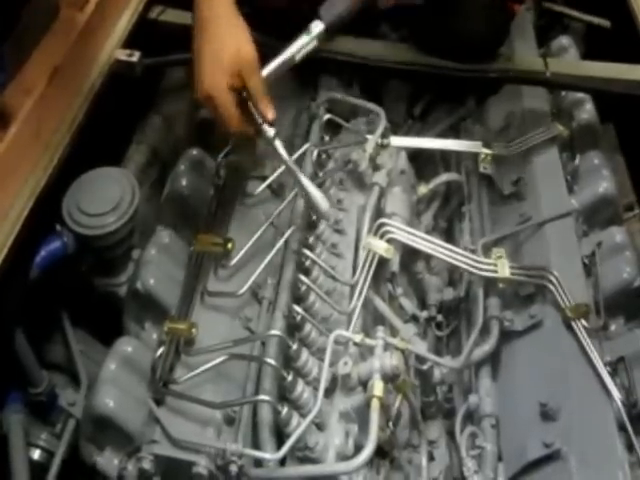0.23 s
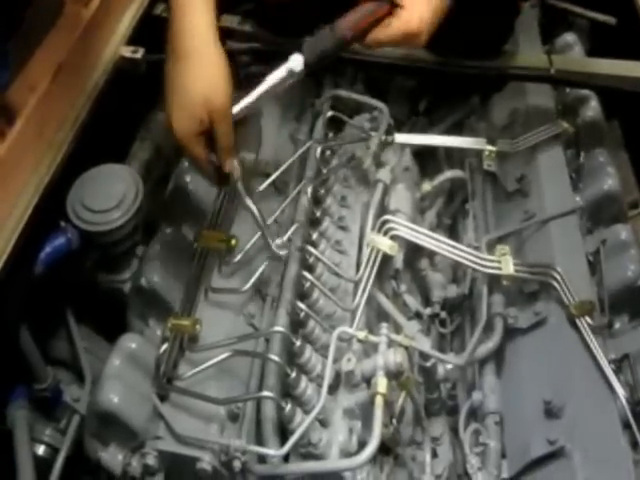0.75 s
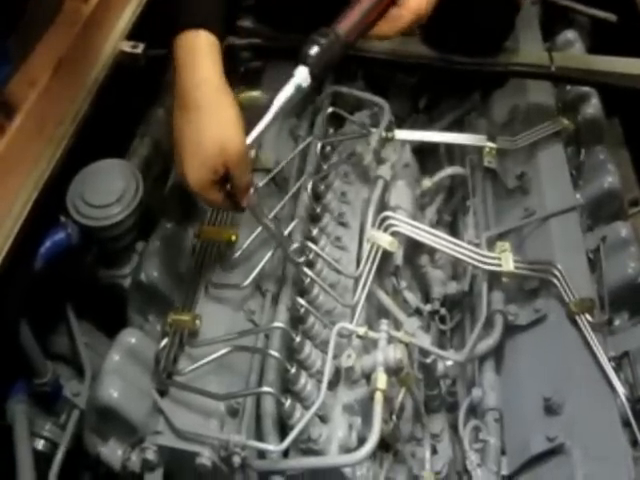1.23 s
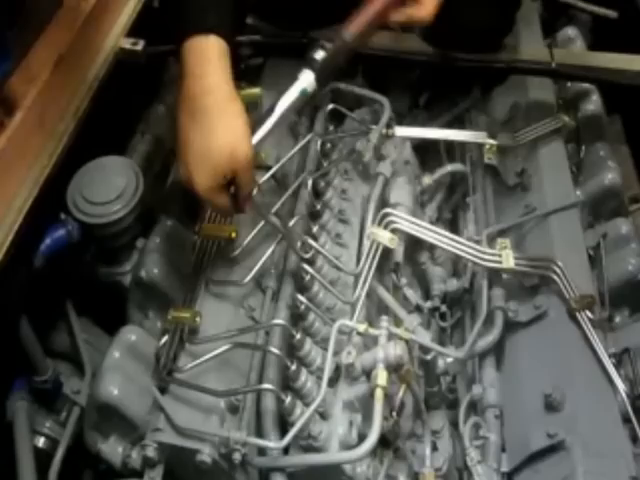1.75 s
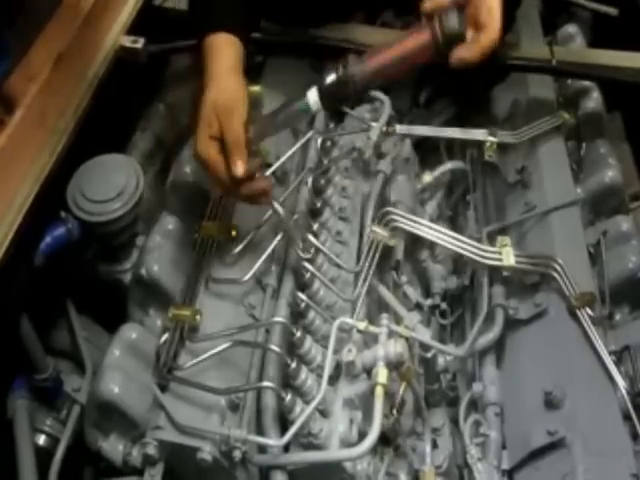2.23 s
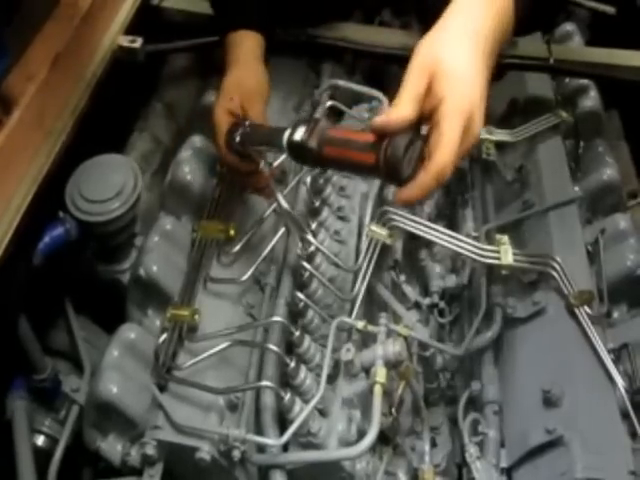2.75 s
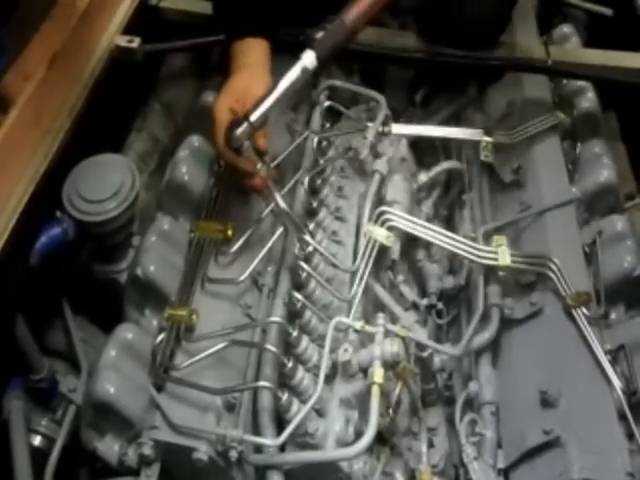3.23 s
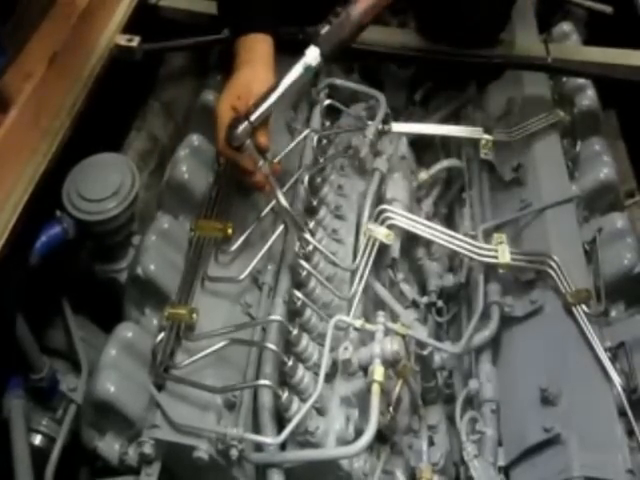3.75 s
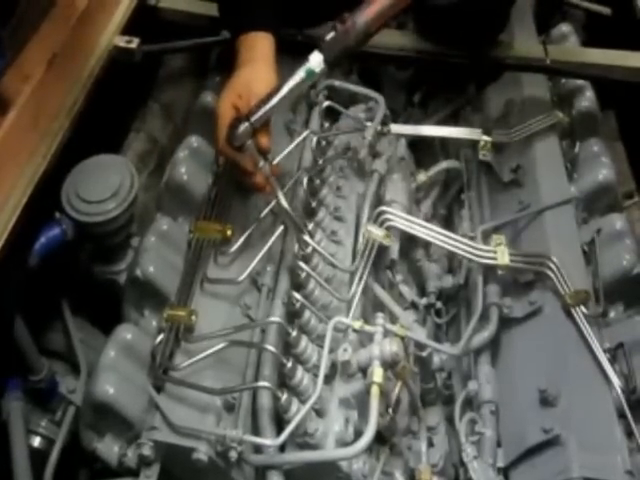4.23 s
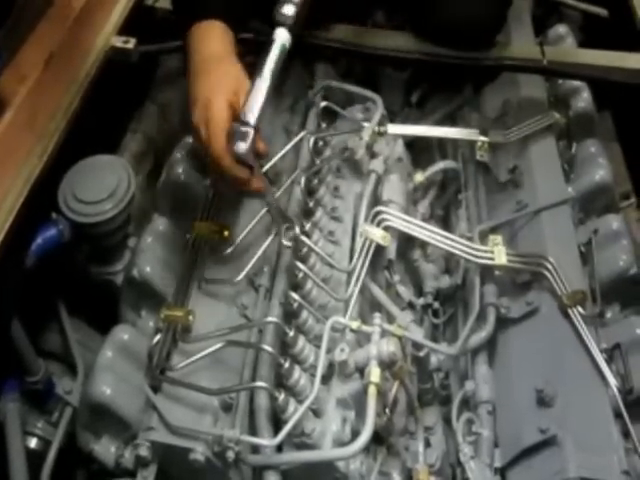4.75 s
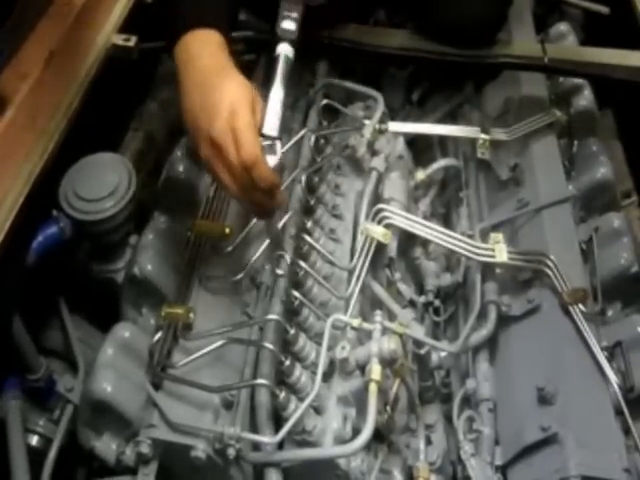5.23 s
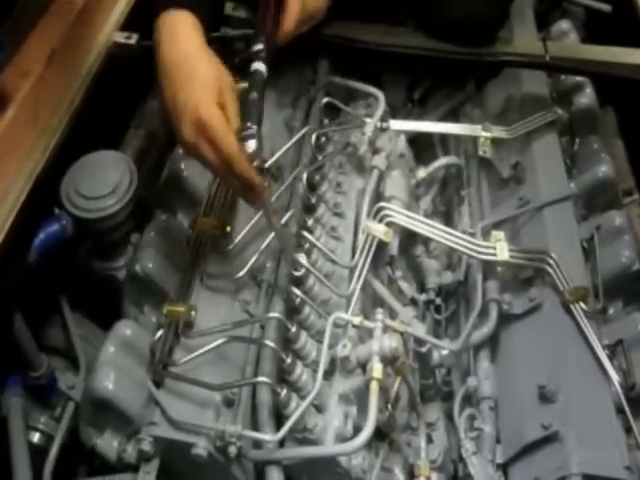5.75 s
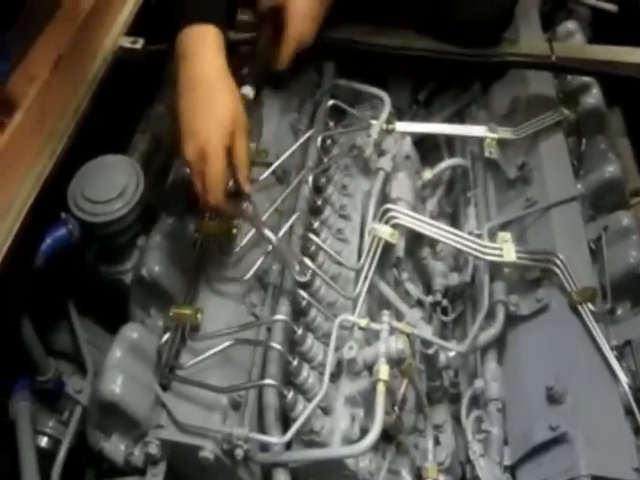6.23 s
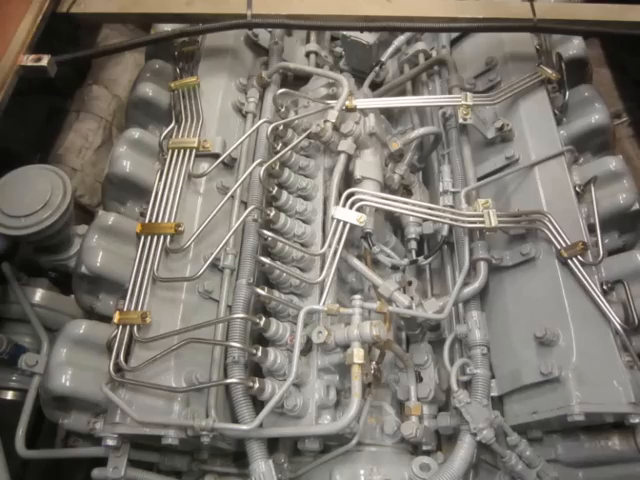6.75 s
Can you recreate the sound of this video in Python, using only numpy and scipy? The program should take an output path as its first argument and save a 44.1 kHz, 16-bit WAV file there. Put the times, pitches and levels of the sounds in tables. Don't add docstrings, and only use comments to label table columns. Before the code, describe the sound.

A low, steady ventilation rumble with soft hiss fills a workshop. After faint ticks, a ratchet rattles in a rapid bright burst at 0.3-0.5 seconds. A hard ringing socket knock lands at 0.8, smaller taps at 0.95, a clang at 1.03. Faint grating leads to a heavy clack at 1.53, another at 1.75, then four slow clicks and a knock at 1.94. Only light ticks and faint rubbing remain until a faster ratchet run at 3.0-3.26, ending in a bright clack at 3.35. After near quiet, a very loud crack strikes at 4.07, overloading the close microphone; the background dips and recovers. Knocks follow at 4.35, 4.52 and 4.76, with short dull pipe resonance. Clanks and scraping run from 5.2, with a loud bright cluster around 5.65. A small clang at 6.06 and soft ticks precede abrupt silence at 6.27.

```python
import sys
import numpy as np
from scipy import signal
from scipy.io import wavfile

SR = 44100
rng = np.random.default_rng(int(sys.argv[2]) if len(sys.argv) > 2 else 0)


def persist_wave(psi):
    counts = np.round(np.clip(psi, -1, 1) * 32767).astype(np.int16)
    wavfile.write(sys.argv[1], SR, np.atleast_2d(counts).T)


def volts_from_decibels(level):
    exponent = np.asarray(level, float) / 20
    return 10 ** exponent


N = 308696

EDGES_HZ = 280 * 2 ** np.arange(0, 5.7, .4)
BANDS_HZ = np.sqrt(EDGES_HZ[1:] * EDGES_HZ[:-1])
BANK = [signal.butter(2, pair, "band", fs=SR, output="sos") for pair in zip(EDGES_HZ, EDGES_HZ[1:])]


def rms_one(x):
    return x / np.sqrt(np.mean(x ** 2) + 1e-20)


def at_hz(points, hz, column=1):
    points = np.array(points)
    return np.interp(np.log(hz), np.log(points[:, 0]), points[:, column])


def add(track, s, sound):
    i = round(s * SR)
    track[i:i + len(sound)] += sound[:N - i]


def dying(t60):
    t = np.arange(4200) / SR
    return np.exp(-np.log(1000) * t / np.clip(t60, .004, .4)[:, None])


def resonate(x, hz, r, gain=1):
    return signal.lfilter([gain, 0, -gain], [1, -2 * r * np.cos(2 * np.pi * hz / SR), r * r], x)


def blow(colour_db, t60, modes, tail_db):
    fade = dying(t60) + volts_from_decibels(tail_db) * dying(3.7 * t60) + 0.46 * dying(0.16 * t60)
    t = np.arange(fade.shape[1]) / SR
    fade *= np.minimum(t * BANDS_HZ[:, None] / 3.6 + 0.24, 1)
    uneven_db = colour_db + 0.97 * rng.standard_normal(len(BANK))
    noise = rng.standard_normal(fade.shape) * fade * volts_from_decibels(uneven_db)[:, None]
    crowd = sum(signal.sosfilt(band, n) for band, n in zip(BANK, noise))

    hz, db, ring_s = np.transpose(modes)
    phase = 2 * np.pi * hz[:, None] * t
    split = .005 * rng.uniform(.3, 1, (len(hz), 1))
    pair = np.sin(phase) * np.cos(phase * split + 0.6)
    level = volts_from_decibels(db + 3.5 * rng.standard_normal(len(hz))) * rng.choice([-1, 1], len(hz))
    hit = crowd + level @ (dying(ring_s) * pair)
    return hit / np.abs(hit).max()


# (frequency [Hz], level [dB], t60 [s])
PAWL = [(2250, -8, 0.023), (3600, -6, 0.022), (4500, -3.5, 0.025), (5540, -6, .024), (6010, -3.5, 0.055),
        (8000, -8.5, .02), (11300, -14.5, .02)]
# (time [s], peak [dB], strongest ring [Hz])
SWINGS = [(0.3122, -2.5, 5020), (0.3264, -1.5, 5450), (0.3387, -3.5, 4600), (0.35, 0, 4440),
          (0.3604, 0, 4360), (0.3704, -0.5, 5320), (0.3815, 3.5, 5570), (0.3914, 1.5, 6200),
          (0.4005, -0.5, 5750), (0.41, 7, 5700), (0.4205, -1.5, 5540), (0.4286, 3, 5940),
          (0.4363, 4.5, 5960), (0.4434, -1, 5540), (0.4504, 1.5, 5370), (0.4578, 0, 6400),
          (0.4679, -0.5, 2250), (0.4793, -2.5, 6300), (0.4953, -1.5, 4600), (0.5219, -3, 4720),
          (1.803, -8.5, 4700), (1.8303, -8, 4750), (1.86, -8, 5120), (1.8997, -9, 5340),
                (3.027, -6, 4130), (3.049, -3.5, 4500), (3.0682, -3, 4720), (3.0876, 1.5, 4030),
                (3.1063, -1, 5000), (3.1223, -4.5, 5300), (3.137, 0, 8000), (3.152, -1, 7400),
                (3.167, 0.5, 8100), (3.1816, 3, 8100), (3.1955, 2, 8400), (3.2084, -3, 5130),
                (3.228, -3, 7900), (3.258, -7, 4840)]
TOOTH_TOP_DB, TOOTH_BOTTOM_DB, THINS_DB_PER_DB = -17.5, -17, 1.3


def ratchet():
    out = np.zeros(N)
    for s, db, ring_hz in SWINGS:
        bottom_db = TOOTH_BOTTOM_DB - THINS_DB_PER_DB * (db + 2.5) * (s < 1)
        top_db = TOOTH_TOP_DB + 9.0 + 2.5 * (s > 2)
        colour = at_hz([(400, bottom_db - 14.5), (1300, bottom_db + 3.5), (2200, bottom_db + 10.5),
                        (3500, -5.0), (5500, -2.5), (10000, top_db)], BANDS_HZ)
        colour += 5.8 * np.exp(-(np.log2(BANDS_HZ / ring_hz) / 0.23) ** 2)
        modes = np.r_[np.array(PAWL) - [0, 8, 0], [(ring_hz, -8, .02)]]
        add(out, s, volts_from_decibels(db) * blow(colour, 0.03 * (BANDS_HZ / 5000) ** -.2, modes, tail_db=-15.5))
    return out


# (time [s], peak [dB], bottom [dB], top [dB], ring time [s])
KNOCKS = [(0.8128, 6, -16.5, -3.5, 0.048), (0.9309, -8, -15, -9.5, 0.062),
          (0.9576, -10.5, -18.5, -20, 0.09), (1.0315, -7.5, -27.5, -9, 0.033),
          (1.5271, 5.5, -31, -19, 0.027), (1.5434, -5.5, -11.5, -19.5, 0.063),
          (1.5755, -6, -13, -17.5, 0.04), (1.7549, 2, -11, -6, 0.051), (1.9389, -6, -27.5, -16, 0.054),
          (1.945, -13, -25.5, -16.5, 0.053), (1.9528, -12, -21.5, -16, 0.029),
          (2.9919, -12.5, -20.5, -38, 0.017), (3.339, -4, -25, 0, 0.024), (3.3454, -19.5, -20.5, 5, 0.035),
          (3.3605, -22.5, -22, -6.5, 0.021),
          (4.074, 10, -29, -1, 0.023), (4.3473, 8, -12.5, 0, 0.038), (4.5235, 1, -16.5, -12.5, 0.034),
                (4.7596, -7.5, -26, -12.5, 0.04), (4.7741, -13.5, -15.5, -17, 0.048),
                (5.2037, -4.5, -20, -16, 0.036), (5.2991, -12, -6.5, -15.5, 0.04),
                (5.3034, -15, -21.5, -6.5, 0.15), (5.46, -3, -11, -9.5, 0.039),
                (5.486, -8, -20.5, -14, 0.034), (5.6263, -9, -17.5, -23.5, 0.075),
                (5.6367, -11, -16.5, -22, 0.04), (5.6559, 5.5, -24.5, -14, 0.015),
                (5.6605, -3, -12, -10.5, 0.046), (5.6883, -4.5, -8, -10, 0.037),
                (6.0605, -12.5, -33, -26, 0.021)]
# (frequency [Hz], level [dB], t60 [s])
SOCKET = [(8110, 8, 0.029), (11100, -19, .04), (11520, -8, 0.11), (7400, 1.5, 0.065)]
SOCKET_DB, SOCKET_PER_TOP, SOCKET_PER_BOTTOM = -12, 0.3, 0.4


def knocks():
    out = np.zeros(N)
    for s, db, bottom_db, top_db, ring_s in KNOCKS:
        ring_db = SOCKET_DB + SOCKET_PER_TOP * top_db + SOCKET_PER_BOTTOM * bottom_db
        colour = at_hz([(400, bottom_db - 2.5), (1200, bottom_db + 8.5), (3500, 0.014),
                        (6500, top_db + 3), (9000, top_db), (12000, top_db + 1.0)], BANDS_HZ)
        modes = np.array(SOCKET) + [0, ring_db + 1.5, 0]
        add(out, s, volts_from_decibels(db) * blow(colour, ring_s * (BANDS_HZ / 4000) ** -.25, modes, tail_db=-21.5))
    return out


# (time [s], peak [dB])
LOOSE = [
    (0.8135, -3),
    (0.9315, -20.5),
    (1.7543, -20.5),
    (4.5238, -28),
    (4.3478, -25),
    (5.6545, -9),
]


def loose_socket():
    out, flat = np.zeros(N), np.zeros(len(BANK))
    for s, db in LOOSE:
        add(out, s, volts_from_decibels(db) * blow(flat - 30, flat + .02, np.array(SOCKET) * [1, 1.8, 1.6], tail_db=-31))
    return out


# (time [s], peak [dB], pitch [Hz])
THUDS = [(0.815, -18.5, 549), (0.958, -26, 538), (1.53, -22, 425.5), (1.576, -25.5, 636),
         (1.758, -22.5, 422), (1.943, -27.5, 615), (4.524, -22, 550), (4.54, -22, 432), (4.759, -26.5, 489),
         (4.348, -30, 379), (4.774, -28, 531), (5.203, -21.5, 537), (5.46, -25, 450), (3.27, -31.5, 474),
         (5.489, -25, 520), (5.63, -29, 421), (5.653, -22.5, 411), (5.687, -29.5, 395)]
# (time [s], peak [dB], pitch [Hz])
PIPES = [
    (1.528, -17, 1163),
    (1.753, -13.5, 1405),
    (4.074, -16, 1077),
    (4.347, -14, 1365),
    (4.525, -11, 1292),
    (5.655, -10.5, 1161),
]


def thuds():
    out, t = np.zeros(N), np.arange(4200) / SR
    for s, db, hz in THUDS + PIPES:
        modes = hz * np.array([1, 0.83, 1.17, 1.38, 1.5, 2.3])[:, None]
        ring = np.sin(2 * np.pi * (modes * t + rng.random((6, 1))))
        ring *= [[.9], [.45], [.55], [.55], [.45], [.4]]
        swell = np.minimum(t / 0.0018, 1)
        add(out, s, volts_from_decibels(db + 3) * ring.sum(0) * dying(np.array([30 / hz]))[0] * swell)
    return out


# (time [s], peak [dB], strongest ring [Hz])
TICKS = [(0.0403, -20.5, 3200), (0.2838, -18, 3800), (1.2126, -27, 2000), (1.4656, -23, 2150),
         (1.6312, -24, 3770), (1.6586, -30, 3940), (2.0213, -30, 2780), (2.0547, -25, 3700),
         (2.0874, -30, 4440), (2.173, -32.5, 2000), (2.9357, -24.5, 2380), (4.4593, -22.5, 2120),
         (4.5144, -30, 3730), (4.6698, -35.5, 3900), (4.7127, -22, 3650), (4.9554, -36, 2220),
         (5.0394, -31, 3540), (5.4016, -25.5, 2900), (5.5692, -26, 2487), (5.8137, -21, 3130),
         (5.9035, -26.5, 3600), (6.2008, -29, 2160), (6.2163, -26, 3740), (6.2662, -23.5, 3600)]
# (time [s], peak [dB], strongest ring [Hz])
CLANGS = [
    (1.0331, 4.5, 5650),
    (1.5269, 4.5, 5390),
    (1.9433, -6.5, 3240),
    (3.3467, -0.5, 5530),
    (4.5252, -22, 3840),
    (4.7606, -7, 5250),
    (5.2039, 1, 3410),
    (5.6545, 2, 7400),
    (6.0608, -3, 4227),
]
FALL_DB, FALL_STEEPENS_DB = 15.5, 8


def ticks():
    out = np.zeros(N)
    for s, db, ring_hz in TICKS + CLANGS:
        fall_db = FALL_DB + FALL_STEEPENS_DB * np.log2(ring_hz / 4000)
        octaves = np.log2(BANDS_HZ / ring_hz)
        colour = 4.7 * np.minimum(octaves, 0) - fall_db * np.maximum(octaves, 0)
        t60 = np.full(len(BANK), 0.021)
        add(out, s, volts_from_decibels(db) * blow(colour, t60, [(ring_hz, -15, .018)], tail_db=-29.5))
    return out


# (start [s], length [s], level [dB], brightest [Hz], singing [dB])
SLIDES = [(1.311, 0.22, -32.5, 4500, -24.5), (1.5125, .015, -5.5, 3000, -18.5), (1.533, 0.04, -22, 1500, 2),
          (1.922, 0.031, -20, 2500, -23), (0.927, .022, -34, 3003, 13.5), (5.33, 0.11, -31, 4500, -16),
          (5.443, .018, -15, 2500, -15), (5.481, 0.023, -22.5, 3000, -12.5),
          (5.63, .03, -21.5, 2500, -11.5), (5.687, 0.038, -24.5, 2500, -23.5),
          (6.049, .016, -23.5, 2994, -15.5)]
# (start [s], length [s], level [dB],
# brightest [Hz], singing [dB])
RUBS = [(1.3, 0.29, -31.5, 1210, -22), (2.2, 0.51, -41, 6100, -20), (3.36, .2, -38, 2530, -8),
        (3.272, 0.13, -22, 3430, -13.5), (3.785, .25, -49, 2300, 3), (.445, .065, -24.5, 2284, 2),
        (4.078, 0.091, -17.5, 5000, -23.5), (4.53, .06, -16, 1610, -14), (4.78, 0.63, -37.5, 1782, -12),
        (4.976, .06, -27.5, 4240, -25.5), (5.25, 0.32, -24, 1200, -19.5)]


def slides():
    out, r = np.zeros(N), np.exp(-np.pi * 90 / SR)
    strokes = [(*row, SOCKET[0][0]) for row in SLIDES] + [(*row, row[3]) for row in RUBS]
    for s, length, db, bright_hz, sing_db, hz in strokes:
        t = np.arange(16000) / SR / length
        stroke = np.sqrt(np.sin(np.pi * np.minimum(t, 1) ** .6)) * (t < 1) * np.exp(-1.2 * t)
        grit = rng.standard_normal(len(t)) * volts_from_decibels(1.5 * rng.exponential(1, len(t))) * stroke
        grit = grit[:int(length * SR) + 999]
        octaves = np.log2(BANDS_HZ / bright_hz)
        gains = volts_from_decibels(3.0 * np.minimum(octaves, 0) - 13 * np.maximum(octaves, 0) - 3)
        gains = gains * (-1) ** np.arange(len(BANK))
        rasp = sum(gain * signal.sosfilt(band, grit) for gain, band in zip(gains, BANK))
        sing = resonate(grit, hz, r, 1 - r)
        add(out, s, volts_from_decibels(db) * (rasp + volts_from_decibels(sing_db + 17.0) * sing))
    return out


# (frequency [Hz], t60 [s], level [dB])
WALLS = [(278, 0.17, -0.5), (756, 0.078, -2), (1500, 0.16, -10), (3300, 0.21, -21), (6810, 0.13, -13),
         (11000, 0.0809, -31.5)]


def workshop(x):
    t, tail = np.arange(12000) / SR, 0
    for hz, t60, db in WALLS:
        sos = signal.butter(2, [hz / 1.51, hz * 1.65], "band", fs=SR, output="sos")
        band = signal.sosfilt(sos, rng.standard_normal(len(t)))
        fade = np.exp(-np.log(1000) * t / t60) * np.minimum(t / .004, 1)
        tail = tail + volts_from_decibels(db - 24.0) * band * fade
    return signal.fftconvolve(x, tail)[:N]


def drift(rate):
    r = np.exp(-80 * np.pi * rate / SR)
    slow = signal.lfilter([1], [1, -2 * r, r * r], rng.standard_normal(N // 40 + 2002))[2000:]
    return np.interp(np.arange(N) / 40, np.arange(len(slow)), rms_one(slow))


def coloured(spectrum, patchy_db):
    edges, white, out = 16 * 2 ** np.arange(0, 10.1, .5), rng.standard_normal((2, N)), 0
    for k, (low, high) in enumerate(zip(edges, edges[1:])):
        band = signal.sosfilt(signal.butter(2, [low, high], "band", fs=SR, output="sos"), white[k % 2])
        level_db = at_hz(spectrum, np.sqrt(low * high)) + patchy_db * drift(2.6)
        out = out + volts_from_decibels(level_db) * band
    return rms_one(out)


# (frequency [Hz], level [dB per Hz])
RUMBLE = [(12, -30), (20, -15.5), (70, -5.5), (112, 2.5), (173, -6.5), (226, 0.5), (369, -6.5), (497, -19),
          (560, -23.5), (612, -25), (700, -19), (910, -54.5), (1540, -120)]
# (frequency [Hz], level [dB per Hz])
HISS = [(290, -31), (500, -3), (745, -7), (807, -6.5), (2310, -12), (3440, -15), (8160, -25),
        (12000, -30.5), (15600, -53), (22000, -120)]
# (frequency [Hz], width [Hz], level [dB])
DUCT = [(41.8, 24, -4), (106, 18, -19.5), (204.3, 2.7, -10), (225.7, 9.4, -6), (240.3, 17, -5.5),
        (404, 9.5, -16), (512, 13, -18)]
RUMBLE_DB, HISS_DB = -37, -42


def ventilation():
    duct = 0
    for hz, width, db in DUCT:
        hum = resonate(rng.standard_normal(N), hz, np.exp(-np.pi * width / SR))
        duct = duct + volts_from_decibels(db) * rms_one(hum)
    rumble = volts_from_decibels(-0.5) * coloured(RUMBLE, patchy_db=1.0) + duct
    hiss = coloured(HISS[:-2], patchy_db=0.54)
    return volts_from_decibels(RUMBLE_DB) * rumble + volts_from_decibels(HISS_DB) * hiss


def scene():
    steel = ratchet() + knocks() + loose_socket() + thuds() + ticks() + slides()
    return (steel + workshop(steel) + ventilation())[None]


# (time [s], depth [dB], recovery [s])
DUCKS = [
    (-.1, -5, 0.55),
    (.4, -1.5, 0.9),
    (1.55, -3.5, 0.22),
    (1.78, -0.5, 0.091),
    (4.09, -9.5, 0.46),
    (4.36, -3, .05),
    (4.54, -4, 0.24),
    (5.7, -2.5, 0.53),
]
DUCK_ATTACK_S = .015


def gain_control():
    s, depth_db, recovery_s = np.transpose(DUCKS)[:, :, None]
    since = np.maximum(np.arange(N) / SR - s, 0)
    duck_db = depth_db * (1 - np.exp(-since / DUCK_ATTACK_S)) * np.exp(-since / recovery_s)
    return volts_from_decibels(duck_db.sum(0))


def roll_off(x):
    return signal.sosfilt(signal.butter(12, 12470, fs=SR, output="sos"), x)


CUTOFF_HZ, STOP_S = 13300, 6.2695


def record(dry):
    overloaded = np.clip(dry * gain_control(), -1.1, 1.1)
    cut = signal.sosfilt(signal.cheby2(10, 50, CUTOFF_HZ, fs=SR, output="sos"), overloaded)
    running = np.clip((STOP_S - np.arange(N) / SR) / 0.00091, 0, 1)
    return roll_off(np.clip(cut * running, -1, 1))


dry = scene()
out = record(dry)
persist_wave(out)
```